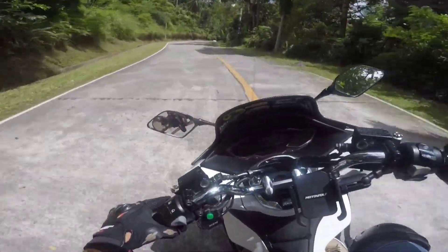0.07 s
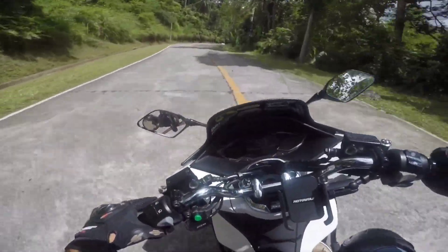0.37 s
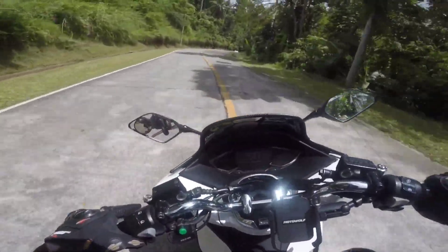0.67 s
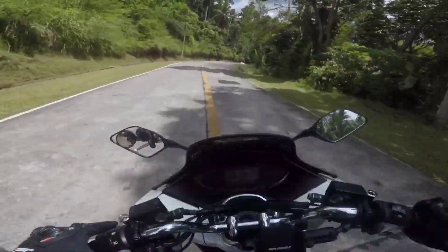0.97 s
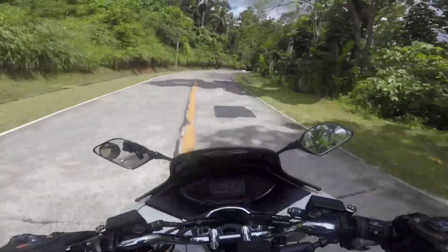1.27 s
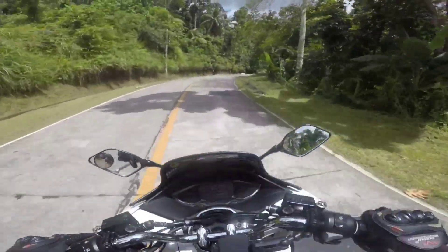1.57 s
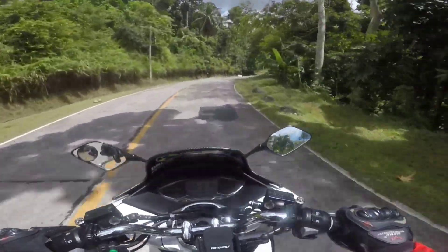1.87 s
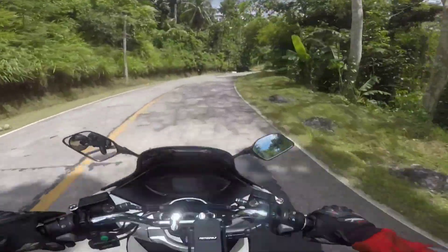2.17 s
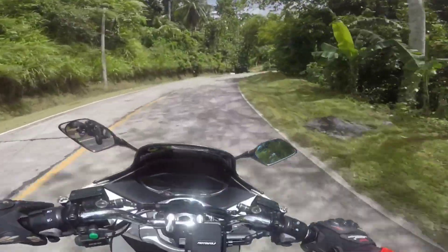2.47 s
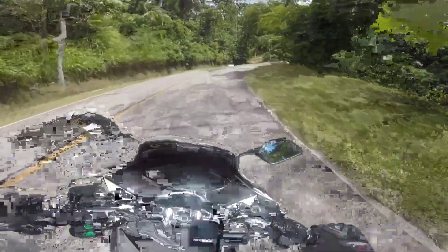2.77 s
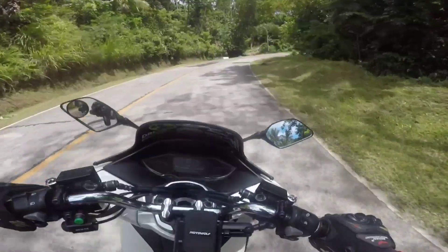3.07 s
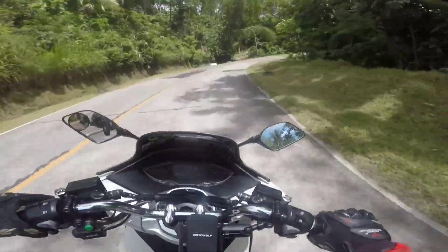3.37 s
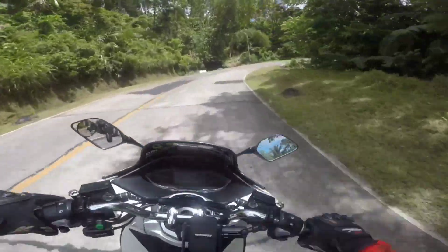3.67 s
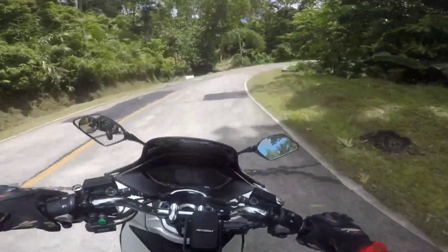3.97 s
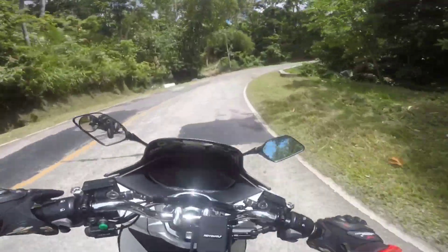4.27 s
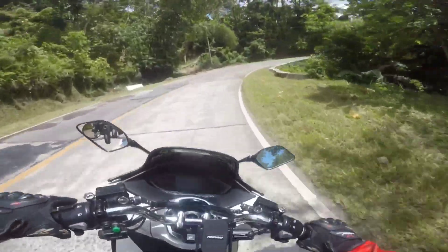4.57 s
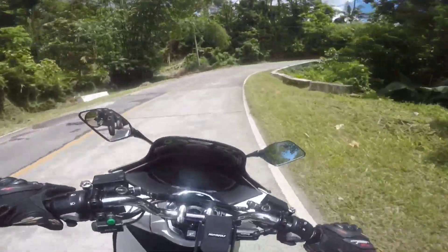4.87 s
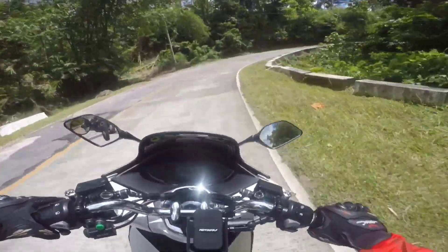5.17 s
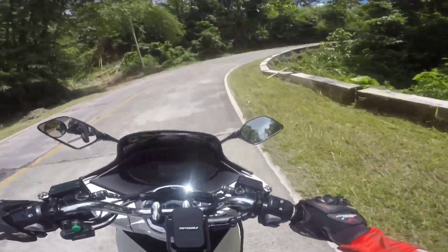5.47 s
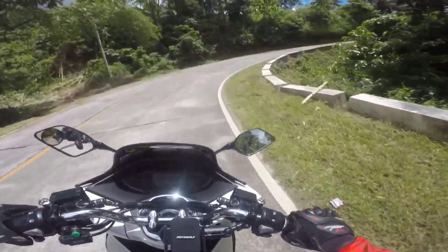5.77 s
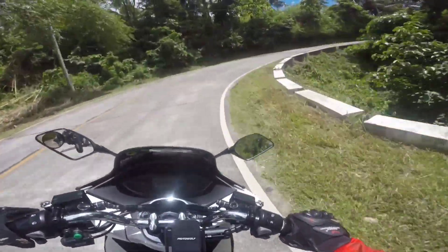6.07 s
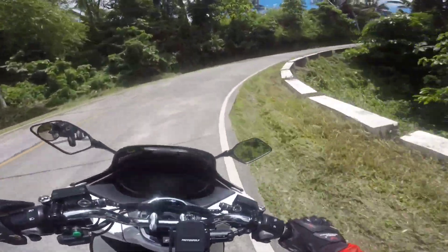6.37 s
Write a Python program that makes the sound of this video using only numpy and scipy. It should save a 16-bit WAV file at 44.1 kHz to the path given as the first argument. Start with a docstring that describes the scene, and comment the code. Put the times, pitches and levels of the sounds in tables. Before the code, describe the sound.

Outdoors, a microphone on the rider's chest catches a scooter engine barking steadily over rumbling wind and tyre roar. The throttle then closes and the bark gives way to gentle puffs of exhaust, dropping in pitch and later growing deeper and fuller. A few short knocks and faint stone ticks come off the bodywork, while a light drive whine falls with the speed and gusts keep thumping the microphone.

```python
"""A hard exhaust bark, close up: a single-cylinder scooter pulling, heard from the rider's chest.
After two seconds the throttle shuts, the revs fall and the bark gives way to a soft putter of gas puffs.
Underneath, tyre roar on concrete, air hiss and the whine of the final drive sink with the road speed.
Gusts buffet the microphone, bumps and stones knock on the bodywork, and a thin whistle slips by late on."""
import sys
import numpy as np
from scipy import signal
from scipy.fft import rfft, irfft
from scipy.io import wavfile
from scipy.ndimage import uniform_filter1d, map_coordinates

SR = 44100
rng = np.random.default_rng(int(sys.argv[2]) if len(sys.argv) > 2 else 0)


def master_out(mix):
    """Clip the mix to full scale and print it as 16-bit PCM to the path in sys.argv[1]."""
    frames = np.transpose(np.atleast_2d(mix))
    ceiling = np.clip(frames, -1, 1)
    pcm = np.round(ceiling * 32767).astype(np.int16)
    wavfile.write(sys.argv[1], SR, pcm)


N = 282681
TIME = np.arange(N) / SR
SHUT_AT_S = 2.045  # the throttle closes

# Tone of the faint hiss bed: freq_hz, level_db
BED_SPECTRUM = [(3000, -2.5), (5200, -1), (7800, -2), (9500, -6), (13500, -15.5), (15500, -20)]

# Grit scuffed by the tyres: centre_s, half_length_s, level_db
SCUFFS = [(3.83, .03, -63), (4.36, 0.017, -56.5), (4.372, 0.03, -66), (4.872, .05, -67.5)]
# Tone of grit and small fittings: freq_hz, level_db
GRIT_SPECTRUM = [(1500, -8), (2500, 0), (4200, 1), (5400, -3.5), (7300, 2.5), (9500, -5), (12000, -8.5),
                 (14000, -13.5), (15500, -21.5)]
# Bodywork knocks over bumps: start_s, level_db, decay_s
KNOCKS = [(2.82, -34, 0.038), (3.408, -26.5, 0.0086), (3.981, -28.5, .009), (5.236, -38, 0.0047)]
# Dull tone of those knocks: freq_hz, level_db
KNOCK_SPECTRUM = [(400, -19), (800, 9), (1400, 5.5), (2200, -12), (3300, -20), (4500, -20), (9000, -48)]
# Stones hitting the bodywork: start_s, level_db, pitch_hz
STONE_TICKS = [(2.79, -63, 12000), (3.417, -50, 7900), (3.783, -49, 3500), (4.205, -59, 11000),
               (4.52, -60, 10000), (4.603, -54, 10000), (4.815, -54, 6500), (5.018, -62, 11520),
               (5.052, -50, 4200)]

# Road speed, as the mesh rate of the final drive: time_s, mesh_hz
GEAR_MESH = [(0, 347), (2.2, 368.7), (3.1, 365.4), (3.5, 351.3), (4.35, 328), (5.6, 279), (6.41, 256.5)]
# Fader ride of the gear whine: time_s, level_db
WHINE_LEVEL = [(2.2, -61), (2.7, -42.5), (3.2, -42.5), (3.8, -45.5), (4.35, -42.5), (4.8, -48.5),
               (5.4, -43.5), (5.95, -44), (6.41, -48)]
# Coarse stretches of concrete: centre_s, half_length_s, boost_db
COARSE_PATCHES = [(1.104, 0.17, 5.5), (3.6, 0.19, 3.5), (4.234, 0.23, 2), (6.1, 0.2, 4.5)]
# Tone of the tyre roar: freq_hz, level_db
ROAR_SPECTRUM = [(100, -10), (210, -3.5), (280, 1), (360, 0), (450, 1.5), (600, 1), (720, -3.5),
                 (900, -10.5), (1300, -18), (3000, -49.5)]
# Tone of the air hiss: freq_hz, level_db
HISS_SPECTRUM = [(500, -9), (1000, 3.5), (1180, -1.5), (1400, 0), (1600, -3), (2300, -5.5), (2800, -9),
                 (3300, -14.5), (3900, -23), (4500, -26.5), (7800, -32.5), (9500, -42.5), (13500, -47.5),
                 (15500, -50)]

# Steady wind on the microphone: time_s, rumble_db, flutter_db
WIND_LEVELS = [(0, -24.5, -36), (.8, -20.5, -36), (1.8, -24.5, -38), (2.2, -25.5, -41), (3.05, -25.5, -39),
               (4.0, -36.5, -34.5), (4.6, -35, -35), (5.05, -31, -33), (5.45, -23.5, -39), (5.75, -33, -40),
               (6.41, -41, -43)]
# Gusts on top of it: centre_s, half_length_s, rumble_change_db, flutter_change_db
GUSTS = [(2.463, 0.083, 4, 11), (2.625, 0.02, 5, 16.5), (2.762, 0.089, 7, -2), (3.435, 0.038, 11.5, -3),
         (3.586, 0.063, 13, 11.5), (4.312, 0.086, 17.5, 6), (4.761, 0.04, -5, 7.5), (4.85, .03, 8.5, -2),
         (5.525, 0.04, -4, 10), (5.65, 0.022, 1, 2), (5.91, .03, 4, 1), (6.078, 0.022, 15, 10)]
# Sub-bass sway of the largest eddies: freq_hz, level_db
SWAY_SPECTRUM = [(4, 1.5), (11, 2), (19, -8.5), (28, -16), (60, -44.5)]
# Rumble of the middle eddies: freq_hz, level_db
RUMBLE_SPECTRUM = [(14, -12), (24, -9.5), (34, -14), (50, -18), (65, -27.5), (110, -33.5), (300, -63.5)]
# Flutter of the smallest eddies: freq_hz, level_db
FLUTTER_SPECTRUM = [(35, -4), (65, 0), (115, -0.5), (160, -6.5), (230, -8), (350, -13.5), (800, -35.5)]

# Engine revs: time_s, firing_hz
FIRING_RATE = [(0.0, 46.54), (0.35, 46.9), (1.21, 46.77), (2.04, 46.14), (2.34, 37.11), (2.66, 33.24),
               (2.94, 31.96), (3.32, 35.11), (3.66, 36.07), (4.02, 32.46), (4.39, 31.04), (5.36, 29.58),
               (6.41, 28.63)]
# Tone of the intake drone: freq_hz, level_db
DRONE_SPECTRUM = [(200, -50), (300, -25), (355, -3), (390, -14), (435, 5), (470, 3), (520, -23), (900, -54)]
# Exhaust puff while the cylinder only pumps: freq_hz, level_db
PUMP_SPECTRUM = [(20, -20.5), (33, -12.5), (66, 1), (100, -0.5), (135, -0.5), (170, -1), (205, -5.5),
                 (240, -20), (275, -23), (335, -20), (410, -14.5), (480, -22.5), (560, -26.5), (610, -27),
                 (800, -33.5), (1500, -56)]
# Exhaust puff while it fires weakly: freq_hz, level_db
PUTTER_SPECTRUM = [(15, -27.5), (29, -10), (58, -5.5), (88, 0.5), (117, -1), (146, -5), (175, -13.5),
                   (204, -15), (238, -32.5), (290, -32), (350, -31), (440, -24), (520, -24), (750, -56.5),
                   (1500, -56)]
# Gas rush behind each puff: freq_hz, level_db
CHUFF_SPECTRUM = [(250, -9), (350, 0.5), (425, 6), (650, 3), (1000, -17), (2500, -29.5)]
# Fader ride of the putter: time_s, level_db
PUTTER_LEVEL = [(2.35, -25.5), (2.85, -24.5), (3.1, -29), (3.35, -25), (3.68, -28), (3.8, -20.5),
                (4.15, -19.5), (4.5, -21.5), (4.7, -19.5), (5.3, -19.5), (5.5, -21), (5.7, -23),
                (5.87, -19.5), (6.1, -22), (6.41, -17)]
# Silencer tone, on harmonics of the firing rate under load: harmonic, level_db
BARK_HARMONICS = [(1, 1.5), (2, -1), (3, -10.5), (4, -6.5), (5, -9.5), (6, -2.5), (7, -1), (8, -1.5),
                  (9, -6.5), (10, -16), (11, -11), (12, -1), (13, -7), (14, -19), (15, -16), (16, -12),
                  (17, -19.5), (18, -24), (19, -23.5), (20, -39.5)]
# Gas rush with each bark: freq_hz, level_db
BLAST_SPECTRUM = [(130, 2.5), (280, -11), (480, 5), (700, -2.5), (900, -13.5), (1300, -36.5), (3000, -57.5)]
# Rasp of intake and valve gear: freq_hz, level_db
RASP_SPECTRUM = [(300, -28), (700, 3), (1100, -0.5), (1500, -3.5), (1850, -6.5), (2200, -4.5), (2500, -8),
                 (3250, -7.5), (3750, -18), (4800, -25), (6400, -25), (8500, -33), (11000, -39),
                 (15000, -58)]
# Engine casing modes, early and late in the pull: pitch_hz, width_hz, early_db, late_db
CASING_MODES = [(1552, 35, -3.5, -0.5), (1583, 72, 3.5, -0.5), (2177, 74, -9, -9.5), (2220, 51, -12, -5),
                (2717, 88, 1, -24), (2830, 97, -8, -13.5), (3106, 92, -23, -12), (3195, 43, -6.5, -5.5),
                (3340, 170, -6, -22.5), (6180, 360, -21.5, -32)]


def from_db(db):
    """Decibels to gain."""
    return 10 ** (np.asarray(db) / 20)


def rms_one(x):
    """Scaled to rms 1."""
    return x / np.sqrt(np.mean(x ** 2) + 1e-20)


def automation(rows, column=1):
    """One column of a breakpoint curve at every sample."""
    columns = np.transpose(rows)
    return np.interp(TIME, columns[0], columns[column])


def since(start_s):
    """Seconds since a moment; zero before it."""
    return np.maximum(TIME - start_s, 0)


def ramp(start_s, takes_s):
    """A straight fade from 0 to 1."""
    return np.clip(since(start_s) / takes_s, 0, 1)


def settle(start_s, rise_s):
    """An exponential fade from 0 towards 1."""
    return 1 - np.exp(-since(start_s) / rise_s)


def swell(centre_s, half_length_s):
    """A bell curve of height 1."""
    return np.exp(-.5 * ((TIME - centre_s) / half_length_s) ** 2)


def held(start_s, end_s, rise_db_per_s, fall_db_per_s):
    """A gain of 1 from start to end, with a fade on either side."""
    return from_db(-rise_db_per_s * np.maximum(start_s - TIME, 0) - fall_db_per_s * since(end_s))


def struck(start_s, decay_s):
    """The envelope of a hit: quick attack, exponential tail."""
    return settle(start_s, .54 * decay_s) * np.exp(-since(start_s) / decay_s)


def drift(rate_hz):
    """A slow random wobble; rms about 1."""
    hop, run_in = 40, 2000
    pole = np.exp(-2 * np.pi * hop * rate_hz / SR)
    white = rng.standard_normal(N // hop + run_in + 2)
    slow = signal.lfilter([1], [1, -2 * pole, pole * pole], white)[run_in:]
    return np.interp(np.arange(N) / hop, np.arange(len(slow)), rms_one(slow))


def eq_curve(spectrum, size, low_cut):
    """Gain per FFT bin, rolled off above the spectrum's range and, with low_cut, below it."""
    hz, db = np.transpose(spectrum)
    log_hz = np.log(np.maximum(np.arange(size // 2 + 1), .5) * SR / size)
    beyond = np.maximum(log_hz - np.log(hz[-1]), 0)
    if low_cut:
        beyond += np.maximum(np.log(hz[0]) - log_hz, 0)
    return from_db(np.interp(log_hz, np.log(hz), db) - 20 * beyond)


def colour(x, spectrum, size=16384):
    """Minimum-phase EQ, so the ring follows each hit; rms 1."""
    cepstrum = irfft(np.log(eq_curve(spectrum, size, low_cut=True)))[:size // 2]
    cepstrum[1:] *= 2
    impulse = irfft(np.exp(rfft(cepstrum, size)))
    return rms_one(signal.fftconvolve(x, impulse)[:N])


def noise(spectrum):
    """Coloured noise; rms 1."""
    return colour(rng.standard_normal(N), spectrum)


def resonate(x, pitch_hz, width_hz):
    """One resonance with steep skirts; rms 1."""
    edges_hz = [pitch_hz - width_hz / 2, pitch_hz + width_hz / 2]
    return rms_one(signal.sosfilt(signal.butter(2, edges_hz, "band", fs=SR, output="sos"), x))


def tone(hz):
    """A gliding sine; rms 1."""
    return np.sqrt(2) * np.sin(2 * np.pi * np.cumsum(hz) / SR)


def throb(cycle, peak_at, depth_db, sharpness):
    """A gain that swells once in every engine cycle; rms 1."""
    bump = np.exp(sharpness * (np.cos(2 * np.pi * (cycle - peak_at)) - 1))
    return rms_one(from_db(depth_db * bump))


def hiss_bed():
    """A faint steady hiss under everything."""
    return from_db(-67) * noise(BED_SPECTRUM)


def whistle():
    """A thin, wavering note holds for an instant, then slides down and fades; a diffuse echo trails it."""
    start_s, length_s, hold_s = 5.515, .235, .02
    top_hz, sag_hz_per_s, waver_hz, echo_decay_s = 8500, 6000, 70, .035
    falling_s = np.minimum(since(start_s + hold_s), 2 * length_s)
    gate = held(start_s, start_s + length_s, rise_db_per_s=1498, fall_db_per_s=264)
    level_db = -63.5 - 14 * settle(start_s, .13) + 2.5 * drift(50)
    note = gate * from_db(level_db) * tone(top_hz - sag_hz_per_s * falling_s + waver_hz * drift(90))
    tail = rng.standard_normal(SR // 2) * np.exp(-TIME[:SR // 2] / echo_decay_s)
    echo = signal.fftconvolve(note, tail / np.linalg.norm(tail))[:N]
    return note + from_db(-5) * echo


def grains(per_s):
    """Tiny random contacts of uneven size, each a dry, bright click; rms 1."""
    sizes = from_db(-2 * np.minimum(rng.exponential(1, N), 4)) * rng.choice([-1, 1], N)
    return colour(sizes * (rng.random(N) < per_s / SR), GRIT_SPECTRUM)


def grit_and_fittings():
    """The tyres scuff up short swishes of grit; loose fittings rattle faintly along the rough stretch."""
    swishes = sum(from_db(db) * swell(s, half_length_s) for s, half_length_s, db in SCUFFS)
    rattle = from_db(-73) * swell(centre_s=4.2, half_length_s=.8)
    return swishes * grains(per_s=3000) + rattle * grains(per_s=160)


def bodywork(firing_hz):
    """Bumps knock, stones tick and a panel buzzes in sympathy with the engine, over a faint steady ring."""
    knocks = sum(from_db(db) * struck(s, decay_s) for s, db, decay_s in KNOCKS) * noise(KNOCK_SPECTRUM)
    contact = rng.standard_normal(N)
    ticks = sum(from_db(db) * struck(s, decay_s=.0035) * resonate(contact, hz, width_hz=1500)
                for s, db, hz in STONE_TICKS)
    shaken = 1 / (1 + ((firing_hz - 30.45) / .18) ** 2)  # peaks as the revs pass the panel's resonance
    panel = from_db(-63.5 + 10 * shaken) * resonate(rng.standard_normal(N), pitch_hz=2033, width_hz=87)
    ring = from_db(-56.5) * resonate(rng.standard_normal(N), pitch_hz=837, width_hz=17)
    return knocks + ticks + panel + ring


def road(cycle, mesh_hz):
    """Tyre roar and gently throbbing air hiss, both louder at speed and on coarse concrete."""
    speed_db = 13 * np.log2(mesh_hz / mesh_hz.max())
    coarse_db = sum(db * swell(s, half_length_s) for s, half_length_s, db in COARSE_PATCHES)
    roar = from_db(-35 + speed_db + coarse_db + .25 * drift(12)) * noise(ROAR_SPECTRUM)
    hiss = from_db(-42.5 + speed_db + .57 * coarse_db + drift(9.5)) * noise(HISS_SPECTRUM)
    return roar + hiss * throb(cycle, peak_at=.17, depth_db=1.5, sharpness=1.1)


def gear_whine(mesh_hz):
    """The meshing teeth of the final drive sing an unsteady note and its octave."""
    pitch_hz = mesh_hz * (1 + .016 * drift(22))
    level = from_db(automation(WHINE_LEVEL) + 2.8 * drift(14))
    return level * (tone(pitch_hz) + from_db(-9.5) * tone(2 * pitch_hz))


def eddies(spectrum):
    """Turbulence, compressed so that its eddies come with similar strength; rms 1."""
    turbulence = noise(spectrum)
    power = uniform_filter1d(turbulence ** 2, size=SR // 10)
    return rms_one(turbulence / np.sqrt(power + .071))


def wind():
    """Large eddies rock the microphone's diaphragm; smaller ones rumble and flutter in lumps and gusts."""
    flicker_db = 1.9 * drift(17)
    buffet_db = 4.5 * np.tanh(drift(6.5))
    rumble_db = automation(WIND_LEVELS) + buffet_db
    flutter_db = automation(WIND_LEVELS, column=2) + flicker_db + buffet_db
    for centre_s, half_length_s, rumble_change_db, flutter_change_db in GUSTS:
        gust = swell(centre_s, half_length_s)
        rumble_db += rumble_change_db * gust
        flutter_db += flutter_change_db * gust
    sway = from_db(-20) * eddies(SWAY_SPECTRUM)
    rumble = from_db(rumble_db) * eddies(RUMBLE_SPECTRUM)
    return sway + rumble + from_db(flutter_db) * noise(FLUTTER_SPECTRUM)


def strokes(cycle, opens_at, uneven_db, jitter):
    """One click a cycle as the exhaust valve opens; opens_at and jitter are fractions of a cycle."""
    number = np.arange(int(cycle[-1]) + 1)
    timing, strength = rng.standard_normal((len(number), 2)).T
    clicks = np.zeros(N + 1)
    clicks[np.searchsorted(cycle, number + opens_at + jitter * timing)] = from_db(uneven_db * strength)
    return clicks[:N]


def puffs(clicks, spectrum, size=4096):
    """Each click lets out a smooth slug of gas: pressure rises, then swings as far below; rms 1."""
    gain = eq_curve(spectrum, size, low_cut=False)
    slug = np.roll(irfft(1j * gain), size // 2) * np.hanning(size)
    return rms_one(signal.fftconvolve(clicks, slug, "same"))


def intake_drone(beats):
    """A brief touch of throttle makes the intake drone on the engine's beat."""
    touch = held(start_s=3.31, end_s=3.63, rise_db_per_s=58, fall_db_per_s=130)
    return touch * from_db(-42.5 + 1.5 * drift(14)) * puffs(beats, DRONE_SPECTRUM)


def engine_coasting(cycle):
    """Off the throttle the cylinder pumps soft puffs, which deepen as it fires weakly again."""
    burn = settle(start_s=3.69, rise_s=.43)
    beats = strokes(cycle, opens_at=.2387, uneven_db=0, jitter=.0021)
    putter = (1 - burn) * puffs(beats, PUMP_SPECTRUM) + burn * puffs(beats, PUTTER_SPECTRUM)
    chuff = from_db(-22.5) * noise(CHUFF_SPECTRUM) * throb(cycle, peak_at=.5, depth_db=3, sharpness=3.1)
    waver_db = .5 * drift(7.8)  # the putter wavers in the moving air
    level = settle(SHUT_AT_S, rise_s=.16) * from_db(automation(PUTTER_LEVEL) + waver_db)
    return level * (putter + chuff) + intake_drone(beats)


def casing_ring(cycle, burst, late):
    """Firing blows and loose rattle ring the casing; its modes crossfade from early to late levels."""
    blows = rms_one(strokes(cycle, opens_at=.9, uneven_db=1.5, jitter=.0012))
    rattle = from_db(-2.5) * rng.standard_normal(N) * burst
    return rms_one(sum(from_db(early_db + late * (late_db - early_db)) * resonate(blows + rattle, hz, width)
                       for hz, width, early_db, late_db in CASING_MODES))


def valve_rasp(cycle, burst, repeat_share=.25, size=900):
    """Intake and valve gear rasp in bursts: some contacts repeat every cycle, the rest never do."""
    pattern = rng.standard_normal(size)
    repeating = rms_one(map_coordinates(pattern, [cycle % 1 * size], order=3, mode="grid-wrap"))
    clatter = np.sqrt(repeat_share) * repeating + np.sqrt(1 - repeat_share) * rng.standard_normal(N)
    return colour(clatter * burst, RASP_SPECTRUM)


def disperse(x, corner_hz, stages):
    """All-pass smear: the highs of a pulse arrive first and the lows trail behind."""
    pole = np.exp(-2 * np.pi * corner_hz / SR)
    for _ in range(stages):
        x = signal.lfilter([-pole, 1], [1, -pole], x)
    return x


def exhaust_bark(cycle, loaded_firing_hz=46.7):
    """Hard blow-downs ring the silencer, each with a blast of gas from the pipe."""
    silencer = [(harmonic * loaded_firing_hz, db) for harmonic, db in BARK_HARMONICS]
    silencer += [(1200, -31.5), (2000, -46), (4000, -71.5)]  # treble roll-off
    blowdowns = strokes(cycle, opens_at=.885, uneven_db=.54, jitter=.00021)
    bark = disperse(colour(blowdowns, silencer), corner_hz=398, stages=3)
    blast = noise(BLAST_SPECTRUM) * throb(cycle, peak_at=.923, depth_db=14, sharpness=3.5)
    return from_db(-19) * bark + from_db(-35.5) * blast


def engine_pulling(cycle):
    """The throttle is held, eased a little, then shut: the bark dies first, rasp and casing linger."""
    bark_fall_db_per_s, linger_fall_db_per_s, casing_hang_s = 136, 73, .049
    eased = ramp(start_s=1.06, takes_s=.17)
    late = ramp(start_s=.74, takes_s=.34)  # the casing changes colour and the rasp fills out
    exhaust_db = -2.5 * eased - bark_fall_db_per_s * since(SHUT_AT_S)
    casing_db = -46 - linger_fall_db_per_s * since(SHUT_AT_S + casing_hang_s)
    rasp_db = -38 + 1.5 * late - 1.6 * eased - linger_fall_db_per_s * since(SHUT_AT_S)
    burst = throb(cycle, peak_at=.95, depth_db=8.5, sharpness=3.5)
    return (from_db(exhaust_db) * exhaust_bark(cycle)
            + from_db(casing_db) * casing_ring(cycle, burst, late)
            + from_db(rasp_db) * valve_rasp(cycle, burst))


def scene():
    """Engine, road and wind, mixed in mono at the rider's chest."""
    firing_hz, mesh_hz = automation(FIRING_RATE), automation(GEAR_MESH)
    cycle = np.cumsum(firing_hz) / SR  # running count of engine cycles
    engine = engine_pulling(cycle) + engine_coasting(cycle)
    ride = road(cycle, mesh_hz) + gear_whine(mesh_hz) + bodywork(firing_hz)
    return (engine + ride + wind() + grit_and_fittings() + whistle() + hiss_bed())[None]


def record(dry):
    """Soft-clip the peaks, fade the last instant and cut the extreme top."""
    ceiling, fade_s, stopband_hz = .7, .004, 16416
    rounded = dry / (1 + (dry / ceiling) ** 8) ** (1 / 8)
    fade = np.minimum((TIME[-1] - TIME) / fade_s, 1)
    return signal.sosfilt(signal.cheby2(12, 70, stopband_hz, fs=SR, output="sos"), rounded * fade)


dry = scene()
out = record(dry)
master_out(out)
```